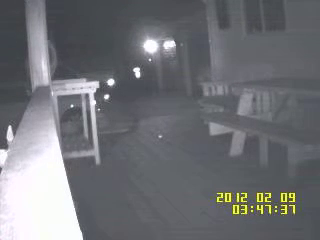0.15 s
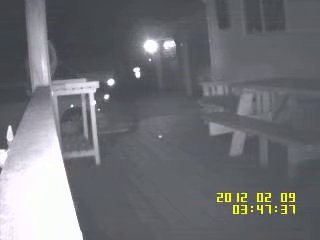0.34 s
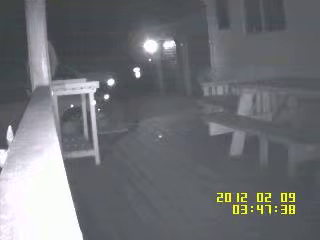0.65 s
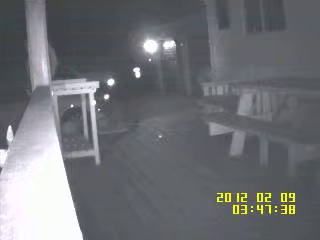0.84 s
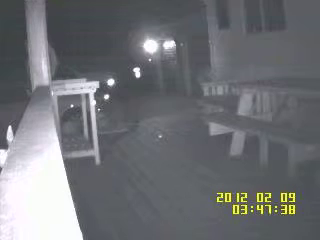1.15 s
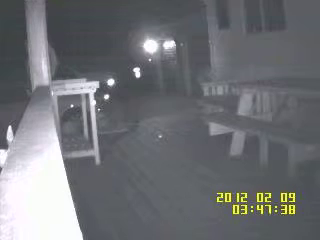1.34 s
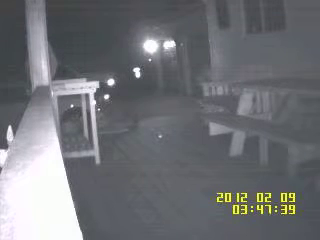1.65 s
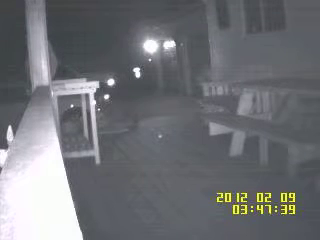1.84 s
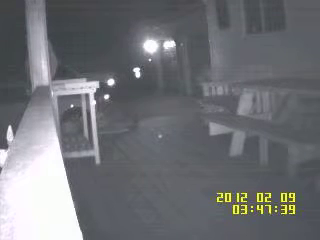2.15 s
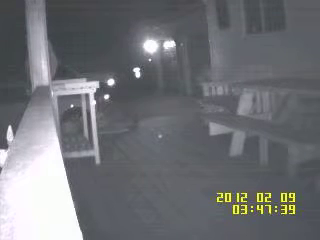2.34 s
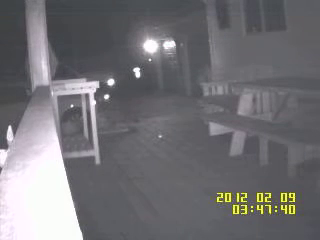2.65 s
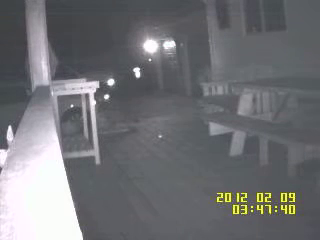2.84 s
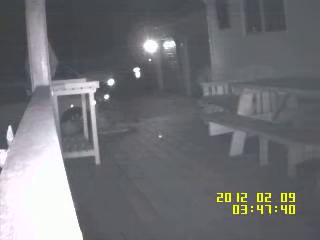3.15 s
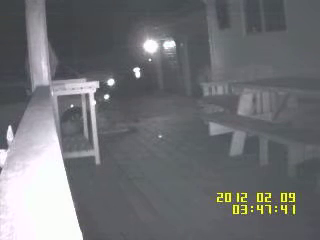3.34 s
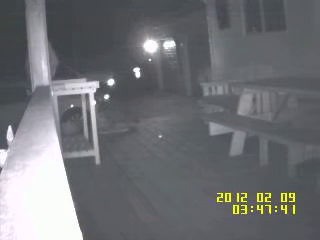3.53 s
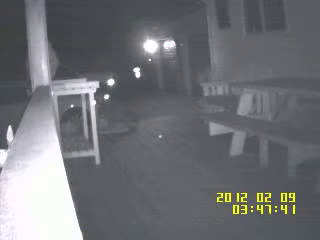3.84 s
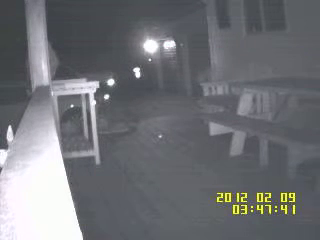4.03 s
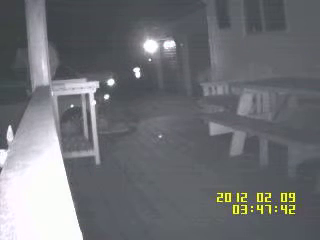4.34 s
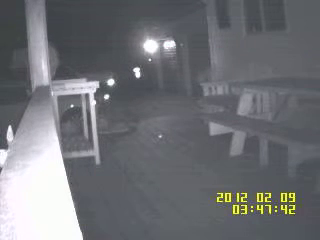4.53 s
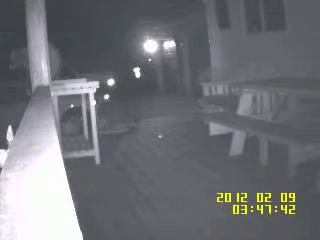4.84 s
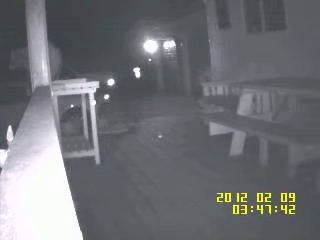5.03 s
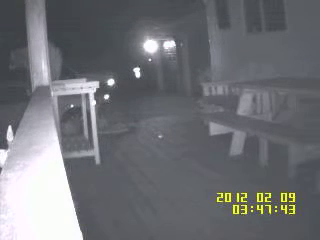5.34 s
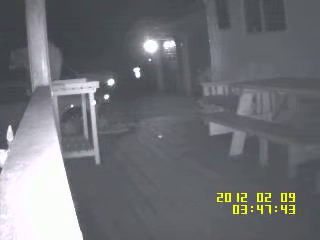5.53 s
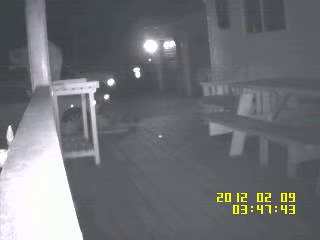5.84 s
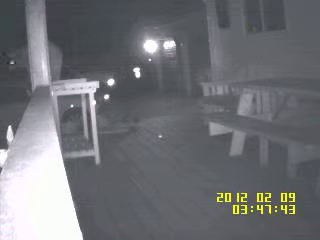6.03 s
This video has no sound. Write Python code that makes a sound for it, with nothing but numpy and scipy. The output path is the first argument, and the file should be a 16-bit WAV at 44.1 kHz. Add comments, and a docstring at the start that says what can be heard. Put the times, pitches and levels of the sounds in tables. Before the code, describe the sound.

A low, even night hiss with faint humming bands runs throughout, in mono with the highest treble missing. From 0.1 to 0.9 s small claws make light, dry scratches and ticks on a wooden post, with a soft fur rustle around 0.4 s. Sparser, fainter ticks continue to 2.1 s, with barely audible knocks near 1.3 and 1.8 s. At 2.4 s the animal's body hits the post: a sudden, loud, hollow woody knock, short and mid-low, with a rapid plastic chatter from the camera housing on the rail. Weaker knocks follow until 2.6 s, over a brief low shudder. Quiet hiss returns until 4.1 s, when another hard, rattling knock strikes, slightly louder and duller; after a gap, smaller knocks cluster from 4.4 to 4.7 s. Fur brushes softly around 4.75 s, and a faint last rustle with fine claw scratches comes at 5.6-5.7 s, leaving hiss.

```python
"""A small animal climbs a wooden deck post at night, over a steady hiss with a few faint humming bands.
First its claws scratch lightly (shaped noise bursts), its fur rustles (swelling treble) and two faint knocks pass.
From 2.4 s and again from 4.1 s its weight knocks the post: ringing modes travel along the rail to a camera
standing on it, and the housing chatters on the first, hardest blow of each group (short pushes into a shell).
A noisy low shudder follows each knock; then the fur rustles and a last flurry of claws comes near 5.6 s."""
import sys
import numpy as np
from scipy import signal
from scipy.fft import rfft, irfft, next_fast_len
from scipy.io import wavfile
from scipy.ndimage import uniform_filter1d, map_coordinates

SR = 44100
rng = np.random.default_rng(int(sys.argv[2]) if len(sys.argv) > 2 else 0)


def magnitude_from_level(level_db):
    """Linear magnitude for a level in decibels (20 dB per decade)."""
    exponent = np.asarray(level_db, float) / 20
    return 10 ** exponent


def wav_record(signal):
    """Record a signal, one row per channel, as 16-bit PCM in the file named by sys.argv[1]."""
    frames = np.transpose(np.atleast_2d(signal))
    bounded = np.clip(frames, -1, 1)
    # unit amplitude maps onto the largest positive 16-bit level
    quanta = np.round(bounded * 32767).astype(np.int16)
    wavfile.write(sys.argv[1], SR, quanta)


N = 271788  # samples

# Tone of the night hiss: (frequency [Hz], relative level [dB])
NIGHT_TONE = [(12, -31.5), (20, 3), (119, -4.5), (208, -9.5), (242, -2), (296, -6.5), (354, -12),
              (434, -6.5), (841, -7), (980, -4.5), (2100, -7), (2390, -6), (6600, -12.5), (7690, -16),
              (8730, -35.5), (11300, -71), (19200, -120)]
# Narrow humming bands: (centre [Hz], width [Hz], level [dB])
HUM_BANDS = [(253, 25, -90.5), (353.3, 8.9, -87), (958, 54, -80), (1182, 10, -81.5), (1439, 33, -79.5),
             (2340, 46, -86.5)]
# The animal shifts its coat: (middle time [s], half length [s], level [dB])
FUR_SHIFTS = [(0.437, 0.15, -77), (4.747, 0.19, -78.5), (5.68, 0.14, -78)]
# Claw scratches: (time [s], level [dB], sharpness [dB], drag [dB], rise [s])
# Sharpness lifts the tip hiss and lowers the wood tap; drag lifts the scrape.
CLAW_SCRATCHES = [(0.1317, -63, 5.5, 1.5, 0.0029), (0.2032, -65, -1.5, 7, 0.0055),
                  (0.309, -73.5, -6.5, .1, 0.0037), (0.649, -69.5, 7.5, .1, .003),
                  (.762, -64, 3, 0.5, .0033), (.771, -62, -0.5, -5.5, 0.004), (.8487, -65.5, 4, -1, .002),
                  (1.042, -67, 9.5, -1, 0.0032), (1.1593, -70.5, 1.5, -1, 0.0036),
                  (1.36, -72, 6.5, -9, .038), (1.4794, -72.5, 3, 4.5, .0045), (1.76, -73.5, -4.5, 0, 0.023),
                  (1.794, -71.5, 8.5, 3, 0.0068), (1.819, -76, 3, 3, 0.0033), (2.129, -72, -2, 3, 0.0078),
                  (4.19, -69.5, -1.5, 0, 0.016), (4.499, -67, 5, 2, 0.0075), (5.6, -73, 2, 4, .012),
                  (5.62, -74, 12, 8.5, 0.004), (5.638, -67, 9, 3.5, 0.028), (5.7044, -77, 2, .1, .005)]
# Tone of the claw tip, also of the fur: (frequency [Hz], relative level [dB])
TIP_HISS_TONE = [(2500, -27), (4300, -5.5), (5000, -6), (6000, -2), (7200, 2), (8200, -12.5), (9000, -28)]
# Tone of the dry scrape: (frequency [Hz], relative level [dB])
SCRAPE_TONE = [(1200, -9.5), (2000, -1), (2800, -3), (3800, 0), (4600, -32)]
# Tone of the small wood tap: (frequency [Hz], relative level [dB])
WOOD_TAP_TONE = [(350, -13), (600, 7.5), (1100, 12), (1500, -1.5), (2300, -36)]
# Fade of a scratch by 60 dB: (hiss [s], scrape [s], tap [s])
SCRATCH_T60_S = (.17, .13, 0.11)
# Landings of the lifted housing: (time after the crest [s], push level at the lift level [dB],
# growth per dB of knock above it [dB])
HOUSING_LANDINGS = [(0, -25.5, 0.5), (.0049, -23.5, 0), (.0061, -64.5, 10.5), (.01, -56, 6.5),
                    (0.019, -61, 7.5)]
# Resonances of the camera housing: (frequency [Hz], width [Hz], level [dB])
HOUSING_SHELL = [(910, 27, 12.5), (1120, 150, 7.5), (1470, 86, -1), (7400, 310, -14.5)]
# Knocks of the body on the post: (crest time [s], level [dB], hardness [dB per octave up],
# weight [dB per octave down])
BODY_KNOCKS = [(1.294, -67, 11, -11), (1.79, -71, 3, -4), (2.3694, -25, -5.5, -0.5), (2.441, -57, 5, 9),
               (2.4793, -35.5, -4.5, 1.5), (2.5136, -40, 2, 3), (2.541, -54, -4, 8), (2.598, -71, -1, 6.5),
               (4.1041, -23, -9.5, -2.5), (4.18, -57, 10, 1), (4.272, -65, 3, 7.5), (4.4403, -31.5, 0, -1),
               (4.522, -64, -4, 8.5), (4.5998, -36.5, 1, -0.5), (4.6602, -43.5, 2.5, 1.5),
               (4.708, -57.5, -1, 7)]
# Pitches of the post and rail modes: (frequency [Hz])
MODE_HZ = [143, 193, 228, 293, 320, 368, 424, 448, 490, 518, 544, 620, 635, 691, 715, 823, 896, 972, 1040,
           1190, 1310, 1460, 1600, 1800, 1960]
# The same modes: (level [dB], 60 dB decay [s], signed motion under the camera [ratio])
RAIL_MODES = [(-13.5, 0.24, 0.92), (-9.5, 0.14, 0.86), (-28, 0.2, -1.2), (-21.5, 0.22, -1.26),
              (-27, 0.16, 0.61), (-13.5, 0.2, 0.98), (-10, 0.23, 0.86), (-30.5, 0.31, 0.8), (0, 0.14, 0.95),
              (-4, 0.15, -0.69), (-11.5, 0.26, 0.87), (-15.5, 0.29, 0.45), (-6.5, 0.041, 0.99),
              (-15.5, 0.22, 0.68), (-12, 0.045, -0.75), (-15.5, 0.15, 0.74), (-23.5, 0.13, -1.4),
              (-19.5, 0.062, 0.76), (-27, 0.1, 0.81), (-26, 0.04, -0.39), (-25, 0.12, -0.34),
              (-24.5, 0.077, -0.011), (-31, 0.072, -1.2), (-35, 0.024, 1), (-32, .06, 0.43)]

NIGHT_DB = -67
FUR_REST_DB = -78  # the coat at rest against the post
TRAVEL_S = 0.012  # from the first tremor to the crest of the bending wave
LIFT_DB = -27  # knocks above this lift the housing off the rail
CONTACT_MS = 0.17  # width of a landing push, between its 1/e points
PIVOT_HZ = 490  # hardness tilts the modes above this, weight those below
# grit shaken loose by a knock: (hiss, scrape, tap) at the lift level, and dB more per dB of knock
JOLT_DB, JOLT_GROWTH, JOLT_T60_S = (-61, -59, -44), 1.8, 0.14
# the post shudders on after a knock; its level is relative to that knock
SWAY_DB, SWAY_RISE_S, SWAY_T60_S, SWAY_WIDTH_HZ = -26, 0.037, 0.59, 22
RAIL_LOW_HZ, RAIL_TOP_HZ = 105, 7800  # knocks and chatter roll off outside these
BAND_LIMIT_HZ = 8940


def along(points, hz):
    """Reads a (frequency [Hz], level [dB]) curve on a log frequency axis."""
    point_hz, point_db = np.transpose(points)
    return np.interp(np.log(hz + 1), np.log(point_hz + 1), point_db)


def unit(x):
    """Scales a signal to rms 1."""
    return x / np.sqrt(np.mean(x ** 2) + 1e-20)


def filtered(x, response):
    """Filters x by a complex response of frequency."""
    size = next_fast_len(N + SR // 2)
    spectrum = rfft(x, size) * response(np.fft.rfftfreq(size, 1 / SR))
    return irfft(spectrum, size)[..., :N]


def noise(tone):
    """Coloured noise of rms 1."""
    return unit(filtered(rng.standard_normal(N), lambda hz: magnitude_from_level(along(tone, hz))))


def resonance(centre_hz, width_hz):
    """Causal response of one damped resonance, with gain 1 at its centre."""
    return lambda hz: 1j * hz * width_hz / (centre_hz ** 2 - hz * hz + 1j * hz * width_hz)


def ringing_noise(response):
    """White noise through a response, at rms 1."""
    return unit(filtered(rng.standard_normal(N), response))


def wobble(rate):
    """A smooth random curve with rate knots a second."""
    knots = rng.standard_normal(int(N * rate / SR) + 4)
    return map_coordinates(knots, [np.arange(N) * rate / SR])


def patchy(x):
    """Random bright and dull patches in pitch and time, so that each scratch has its own colour."""
    bins = signal.stft(x, nperseg=256)[2]
    field = uniform_filter1d(rng.standard_normal(bins.shape), size=4, axis=0)
    field = uniform_filter1d(field, size=8, axis=1)
    gain = magnitude_from_level(2.5 * unit(field))  # 2.5 dB rms
    return unit(signal.istft(bins * gain, nperseg=256)[1][:N])


def night():
    """Even hiss, with noise passed through narrow resonances for the humming bands."""
    hum = sum(magnitude_from_level(db) * ringing_noise(resonance(hz, width)) for hz, width, db in HUM_BANDS)
    return magnitude_from_level(NIGHT_DB) * noise(NIGHT_TONE) + hum


def fur():
    """Fur brushing the wood: a soft, fluttering treble rustle that swells while the animal shifts."""
    t = np.arange(N) / SR
    swells = sum(magnitude_from_level(db) * np.exp(-((t - middle) / half) ** 2) for middle, half, db in FUR_SHIFTS)
    flutter_db = 1.5 * wobble(20)
    return (magnitude_from_level(FUR_REST_DB) + swells) * magnitude_from_level(flutter_db) * noise(TIP_HISS_TONE)


def claws():
    """Gritty bursts of tip hiss, dry scrape and wood tap, catching on the grain; knocks jolt grit loose too."""
    bursts = []  # (start [s], hiss/scrape/tap levels [dB], rise [s], decays [s])
    for s, db, sharp_db, drag_db, rise in CLAW_SCRATCHES:
        bursts.append((s, [db + sharp_db, db + drag_db, db - sharp_db], rise, SCRATCH_T60_S))
    for s, db, *_ in BODY_KNOCKS:
        jolt_db = np.add(JOLT_DB, JOLT_GROWTH * (db - LIFT_DB))
        bursts.append((s - TRAVEL_S, jolt_db, TRAVEL_S, [JOLT_T60_S]))

    t = np.arange(SR // 3) / SR
    strokes = np.zeros((3, N + SR))
    for s, layers_db, rise, t60 in bursts:
        fade_db = -60 * np.maximum(t - rise, 0) / np.reshape(t60, (-1, 1))
        shape = np.clip(t / rise, 0, 1) * magnitude_from_level(fade_db)
        strokes[:, round(s * SR):][:, :len(t)] += magnitude_from_level(np.reshape(layers_db, (-1, 1))) * shape

    # the finer the layer, the faster it catches
    grit = magnitude_from_level(2.0 * np.array([wobble(900), wobble(500), wobble(250)]))
    layers = [patchy(noise(TIP_HISS_TONE)), patchy(noise(SCRAPE_TONE)), noise(WOOD_TAP_TONE)]
    return sum(grit * strokes[:, :N] * layers)


def chatter():
    """The housing lifts and lands on the rail: one-sided pushes, each with a brief buzz, ring its shell."""
    landings = []  # (time [s], level [dB])
    for s, knock_db, *_ in BODY_KNOCKS:
        if knock_db > LIFT_DB:
            for after, db, growth in HOUSING_LANDINGS:
                landings.append((s + after, db + growth * (knock_db - LIFT_DB)))

    t = np.arange(-200, 600) / SR
    push = np.exp(-np.abs(t) * 1000 / CONTACT_MS * 2)
    tail = magnitude_from_level(-29 - 60 * t / 0.0026) * (t > 0)  # the buzz falls 60 dB in 2.6 ms
    out = np.zeros(N)
    for s, db in landings:
        buzz = tail * rng.standard_normal(len(t))
        out[round(s * SR) - 200:][:len(t)] += magnitude_from_level(db) * (push + buzz)

    def shell(hz):
        ringing = sum(magnitude_from_level(db) * resonance(centre, width)(hz) for centre, width, db in HOUSING_SHELL)
        low_cut = (1j * hz / (120 + 1j * hz)) ** 2
        return (1 + ringing) * low_cut
    return filtered(out, shell)


def knocks():
    """Every knock rings the same modes, whose swings line up when the bending wave arrives; a shudder follows."""
    t = np.arange(SR // 2) / SR
    hz = np.c_[MODE_HZ]
    mode_db, t60, sign = np.transpose(RAIL_MODES)[:, :, None]
    # a faint tremor comes at once; high bending waves run faster and build up sooner
    build = np.clip(t / TRAVEL_S, 0, 1) ** (3.7 * (PIVOT_HZ / hz) ** 0.5)
    swell = np.clip(t / 0.0021, 0, 1) * (0.086 + 0.73 * build)
    decay = magnitude_from_level(mode_db - 60 * (t - TRAVEL_S) / t60)
    ring = sign * swell * decay * np.cos(2 * np.pi * hz * (t - TRAVEL_S))
    shudder = magnitude_from_level(SWAY_DB - 60 * t / SWAY_T60_S) * np.clip(t / SWAY_RISE_S, 0, 1)

    octaves = np.log2(hz[:, 0] / PIVOT_HZ)
    out, sway = np.zeros(N + SR), np.zeros(N + SR)
    for s, db, hard_db, weight_db in BODY_KNOCKS:
        # a harder contact feeds the high modes, more weight behind it the low ones
        tilt_db = hard_db * np.maximum(octaves, 0) + weight_db * np.maximum(-octaves, 0)
        scatter_db = 0.6 * rng.standard_normal(len(octaves))
        out[round((s - TRAVEL_S) * SR):][:len(t)] += magnitude_from_level(db + tilt_db + scatter_db) @ ring
        sway[round(s * SR):][:len(t)] += magnitude_from_level(db) * shudder

    def two_lowest_modes(f):
        return sum(resonance(centre, SWAY_WIDTH_HZ)(f) ** 2 for centre in MODE_HZ[:2])
    return out[:N] + sway[:N] * ringing_noise(two_lowest_modes)


def scene():
    """All sources in one channel, with knocks and chatter band-limited on their way."""
    def rail(hz):
        top_cut = 1 / (1 + (hz / RAIL_TOP_HZ) ** 16)
        # the rail passes little below its lowest mode
        low_cut = 1 / (1 + (RAIL_LOW_HZ / (hz + 1)) ** 8)
        return top_cut * low_cut
    through_rail = filtered(knocks() + chatter(), rail)
    return (through_rail + claws() + fur() + night())[None]


def low_pass(x):
    """Removes everything above the highest recorded frequency."""
    return signal.sosfilt(signal.butter(12, 8880, fs=SR, output="sos"), x)


def record(dry):
    """The camera keeps nothing above its band limit."""
    band_limited = filtered(dry, lambda hz: hz < BAND_LIMIT_HZ)
    return low_pass(band_limited)


dry = scene()
out = record(dry)
wav_record(out)
```